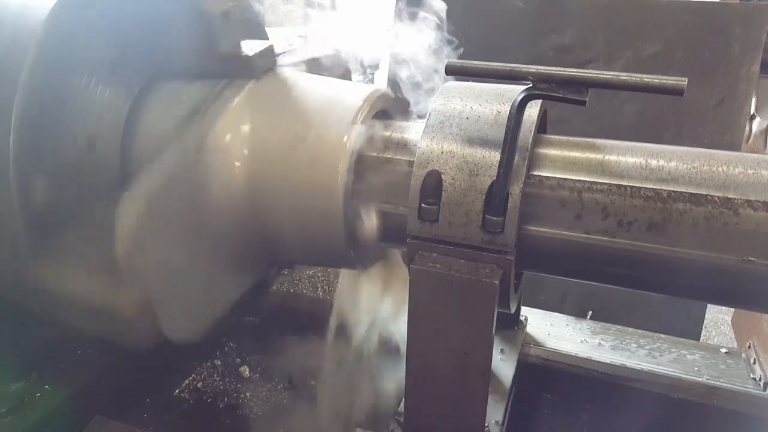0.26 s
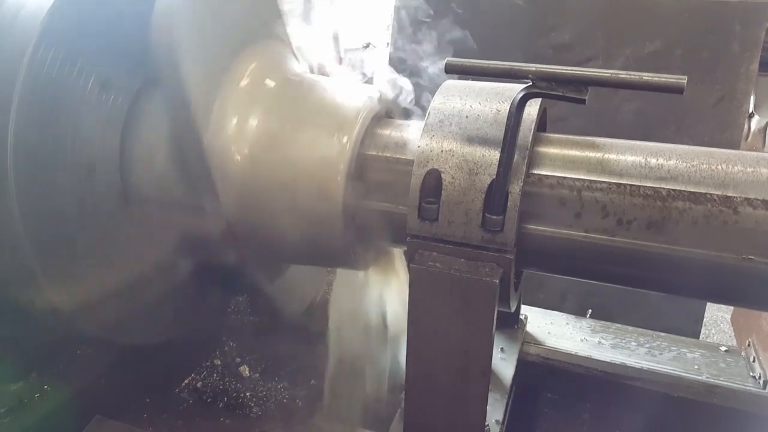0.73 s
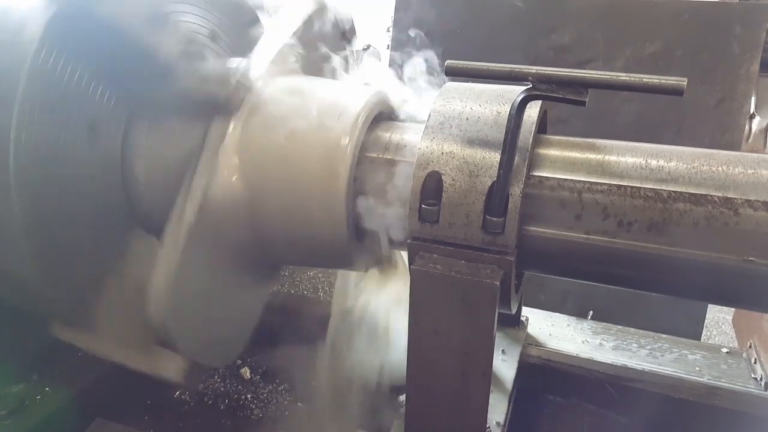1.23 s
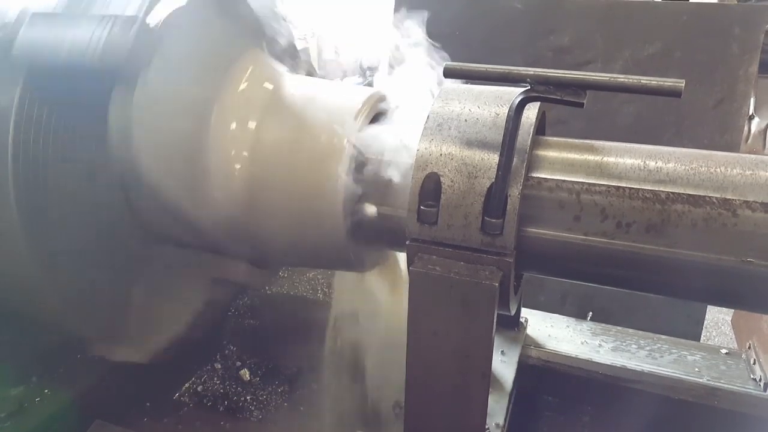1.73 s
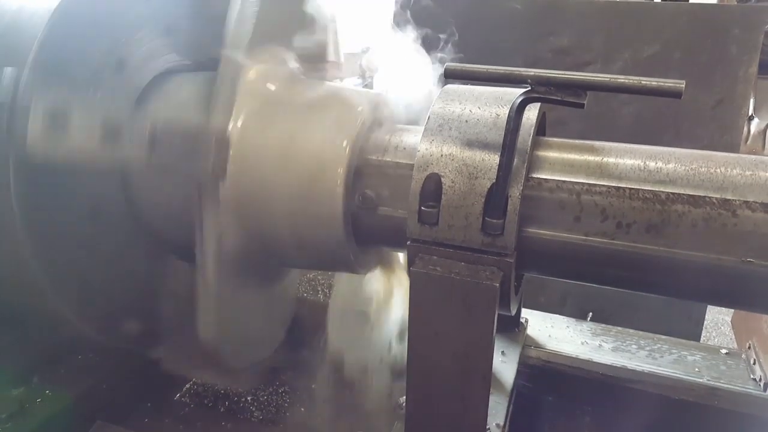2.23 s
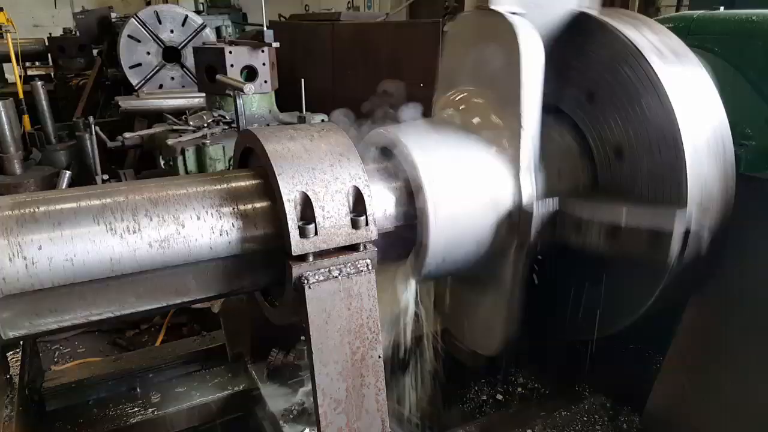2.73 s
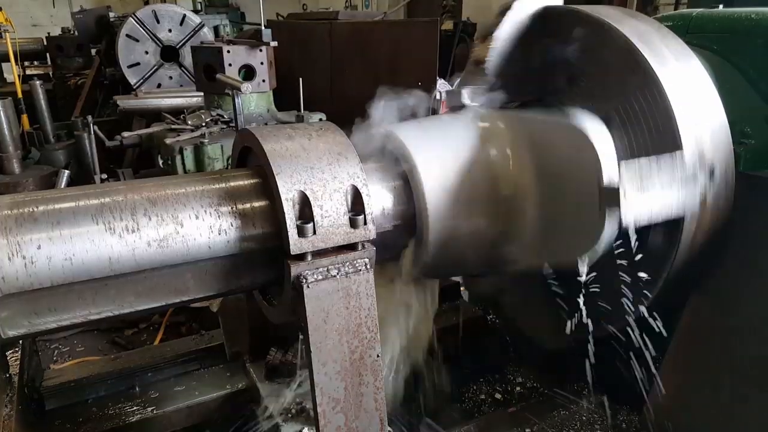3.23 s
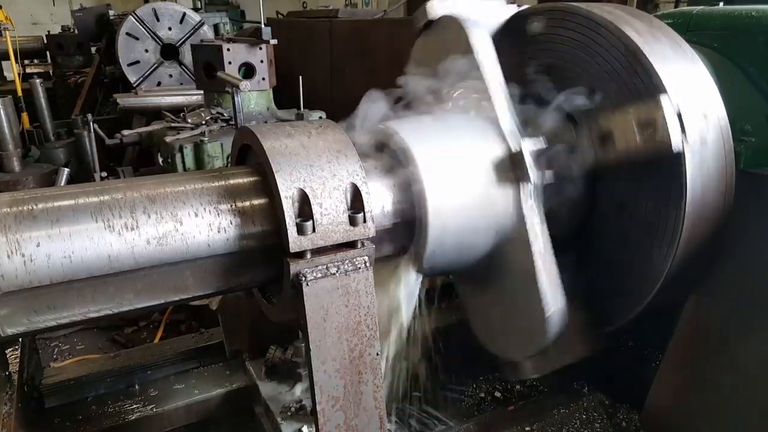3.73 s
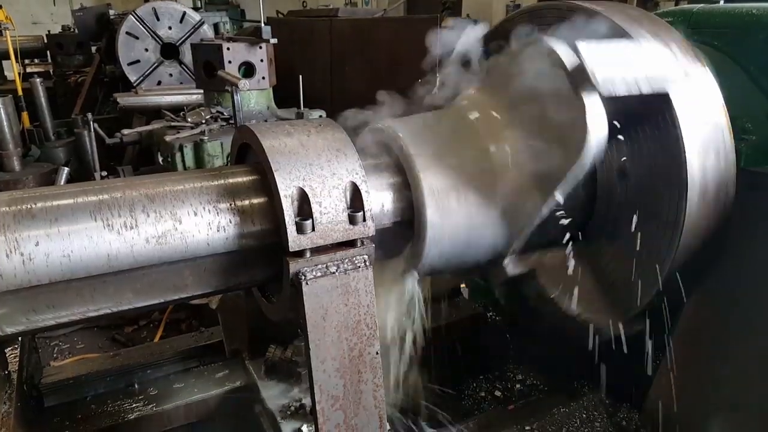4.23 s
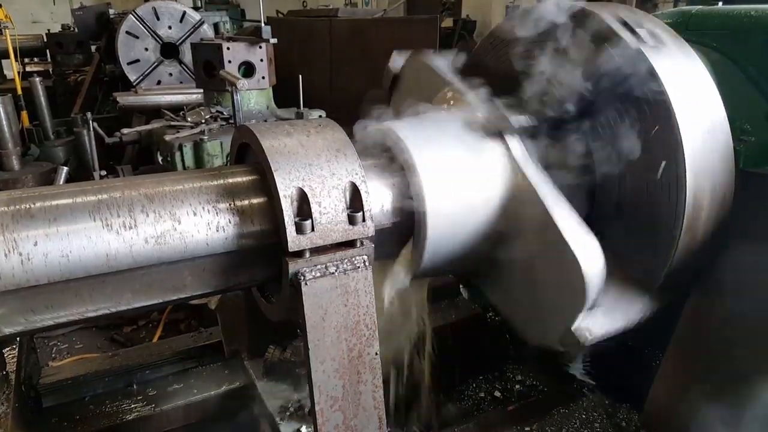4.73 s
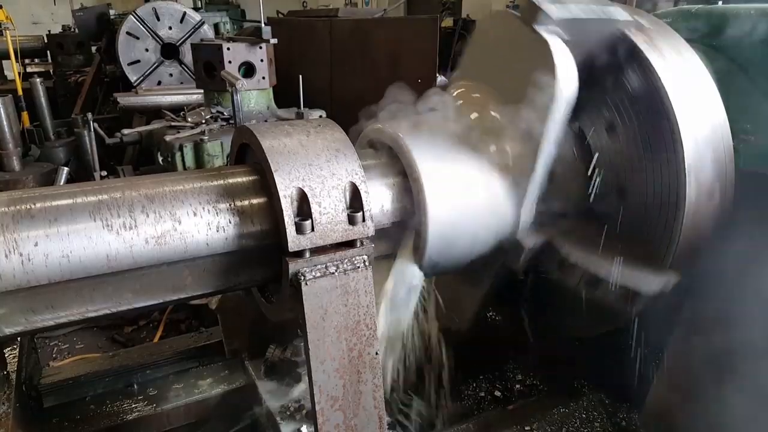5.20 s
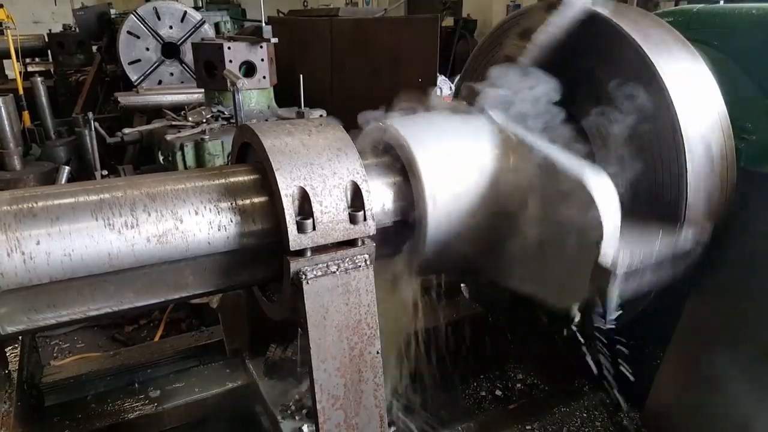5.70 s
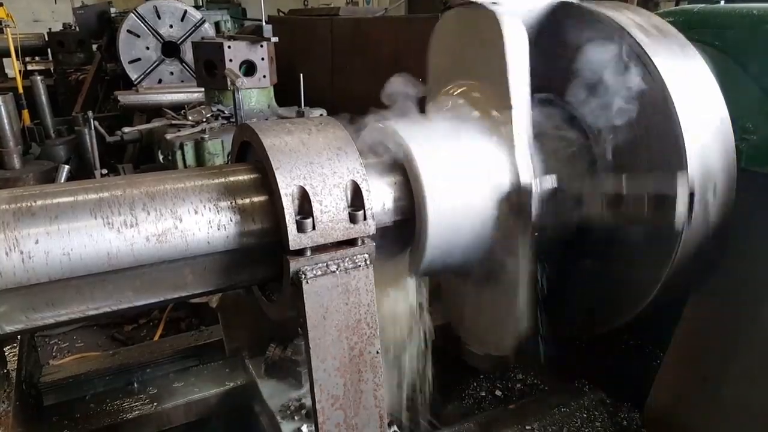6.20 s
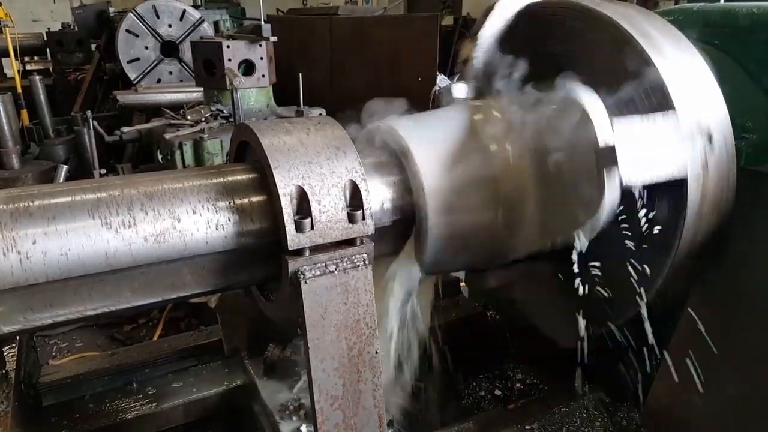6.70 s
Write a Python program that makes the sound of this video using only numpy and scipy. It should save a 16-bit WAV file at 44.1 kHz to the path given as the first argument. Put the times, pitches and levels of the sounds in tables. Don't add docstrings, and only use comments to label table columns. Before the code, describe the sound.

Close to a running lathe in a hard-walled workshop, a cutting tool shrieks and chatters continuously, swelling and easing unevenly. Beneath it lie a fluttering gear hum and soft coolant hiss; thin metallic rings and small chip clicks dot the first part. After a tiny silence the squeal resumes at a lower pitch, with two rough tones beating together and fewer clicks until the abrupt end.

```python
import sys
import numpy as np
from scipy import signal
from scipy.fft import rfft, irfft, next_fast_len
from scipy.io import wavfile
from scipy.ndimage import uniform_filter1d

SR = 44100
rng = np.random.default_rng(int(sys.argv[2]) if len(sys.argv) > 2 else 0)


def inscribe(sig):
    pcm = np.round(np.clip(np.atleast_2d(sig).T, -1, 1) * 32767)
    wavfile.write(sys.argv[1], SR, pcm.astype(np.int16))


def convert_level_to_amplitude(level_db):
    exponent = np.asarray(level_db, float) / 20
    return 10 ** exponent


N = 306495
SPINDLE_PER_S = 0.581


def rms_one(x):
    return x / np.sqrt(np.mean(x ** 2) + 1e-20)


def evened(x):
    return x / np.sqrt(uniform_filter1d(np.mean(x ** 2, axis=0), size=4000))


def at_hz(points, hz):
    point_hz, value = np.transpose(points)
    return np.interp(np.log(hz + 1), np.log(point_hz), value)


def drift(n, rate):
    r = np.exp(-40 * np.pi * rate / SR)
    slow = signal.lfilter([1], [1, -2 * r, r * r], rng.standard_normal(n // 20 + 4002))[4000:]
    return np.interp(np.arange(n) / 20, np.arange(len(slow)), rms_one(slow))


def per_turn(t, rows, rate):
    return sum(swing * np.cos(2 * np.pi * (k * rate * t - lag)) for k, swing, lag in rows)


def resonate(x, hz, width_hz):
    r = np.exp(-np.pi * width_hz / SR)
    top = np.array([1, 0, -1]) * (1 - r * r) / 2
    return signal.lfilter(top, [1, -2 * r * np.cos(2 * np.pi * hz / SR), r * r], x)


# frequency in Hz, left-right likeness from 0 to 1.
EAR_LIKENESS = [(30, .8), (150, 0.99), (400, 0.83), (900, 0.3), (2000, 0.18), (6000, 0.037), (14000, 0.045)]


def banded_noise(n, spectrum, shared_db, own_db, rate):
    size = next_fast_len(n)
    hz = np.arange(size // 2 + 1) * SR / size
    mid, side = rfft(rng.standard_normal((2, size))) * convert_level_to_amplitude(at_hz(spectrum, hz))
    alike = np.clip(at_hz(EAR_LIKENESS, hz), 0, 1)
    pair = np.sqrt(1 + alike) * mid + np.sqrt(1 - alike) * side * np.array([[1], [-1]])
    out, together = 0, drift(n, rate)
    place = np.log2(hz + 1) * 1.5
    lowest, highest = spectrum[0][0], spectrum[-1][0]
    for k in range(int(np.log2(lowest) * 1.5), int(np.log2(highest) * 1.5) + 2):
        band = irfft(pair * np.clip(1 - abs(place - k), 0, 1), size)[:, :n]
        out = out + band * convert_level_to_amplitude(shared_db * together + own_db * drift(n, rate * 2.55))
    return rms_one(out)


def shop(x, wet_db, right_delay):
    t60_s, build_up_s = 0.61, 0.0069
    t = np.arange(SR) / SR
    tail = rng.standard_normal((3, SR)) * convert_level_to_amplitude(-60 * t / t60_s) * np.clip(t / build_up_s, 0, 1)
    tail = tail[:2] + 0.38 * tail[2]
    tail *= convert_level_to_amplitude(wet_db) / np.sqrt(np.sum(tail ** 2, axis=1, keepdims=True))
    tail[[0, 1], [0, right_delay]] += 1
    return signal.fftconvolve(x[None], tail, axes=1)[:, :len(x)]


# chatter in Hz, then squeal, overtones, machine rumble, coolant hiss in dB.
MEAN_CUT = [
    (1301.6, -13, -22, -23.5, -33),
    (1133.6, -10.5, -23.5, -26.5, -35),
]
# moment in seconds, level in dB.
CHIP_GRIPS = [(0.02, 2), (.36, -0.4), (.64, 0.6), (.76, -1.5), (.86, 0.8), (.96, -0.9), (1.06, 3.2),
              (1.14, -4.5), (1.23, 4.5), (1.33, -0.5), (1.46, 3), (1.99, -2), (2.14, 2.4), (2.25, -2),
              (2.61, 2.5), (3.091, 3.5), (3.44, 0.1), (3.63, 5), (3.95, -0.3), (4.21, 3.2), (4.38, -3),
              (4.52, 2.6), (4.62, -2.5), (4.8, 0.7), (5.25, 0.5), (5.52, -1.5), (6.06, 0.9), (6.31, -2),
              (6.51, 1), (6.61, -1)]
# times per turn, swing in dB, lag in cycles.
OVERTONE_SWING = [
    [(1, 0.12, 0.83), (2, 0.37, .84), (4, 0.75, 0.55)],
    [(1, 1.3, 0.59), (2, 0.7, 0.92), (4, .2, 0.26)],
]
# times per turn, swing in dB, lag in cycles.
HISS_SWING = [
    [(1, 1.5, .09), (2, 0.94, 0.5), (4, 0.64, .5), (6, 0.37, 0.38)],
    [(1, 1.3, 0.4), (2, .4, .92), (4, 0.25, 0.11), (6, 0.27, 0.61)],
]
# surges per second, swing in dB, lag in cycles.
BELT_SURGE = [
    (3.315, 0.9, 0.44),
    (3.265, 0.9, 0.38),
]
GIVE_WAY = (.15, 0.49, 0.15)


def levels(t, side):
    half_width_s = 0.046
    grip = sum(db * np.exp(-0.5 * ((t - s) / half_width_s) ** 2) for s, db in CHIP_GRIPS)
    _, squeal_db, overtone_db, rumble_db, hiss_db = MEAN_CUT[side]
    overtone_yield, rumble_yield, hiss_yield = GIVE_WAY
    return (squeal_db + grip,
            overtone_db + per_turn(t, OVERTONE_SWING[side], SPINDLE_PER_S) - overtone_yield * grip,
            rumble_db + per_turn(t, [BELT_SURGE[side]], 1) - rumble_yield * grip,
            hiss_db + per_turn(t, HISS_SWING[side], SPINDLE_PER_S) - hiss_yield * grip)


# times per turn, swing in Hz, lag in cycles.
PITCH_SWING = [
    [(1, 30, .44), (2, 10.74, .81), (4, 11.07, 0.1355), (6, 12.7, 0.86)],
    [(1, 22, .08), (3, 10.96, 0.97), (4, 4.1, 0.702), (6, 11.28, 0.2027)],
]
PITCH_WOBBLE = [
    (0.0574, 0.0805, 0.0305),
    (0.0442, 0.083, 0.03536),
]


def edge(t, side, ratio):
    n, (rate, throb_s) = len(t), GEAR_SHAFT[side]
    swing, lag, wander = PITCH_WOBBLE[side]
    quick = drift(n, 30)
    quick = rms_one(quick - uniform_filter1d(quick, size=5000))
    quick = 1.6 * np.tanh(quick / 1.6)
    gear_swing = swing * np.cos(2 * np.pi * (rate * (t - throb_s) - lag))
    restless = gear_swing + wander * quick + 0.013 * drift(n, 193)
    hz = ratio * (MEAN_CUT[side][0] + per_turn(t, PITCH_SWING[side], SPINDLE_PER_S)) * (1 + restless)
    return 2 * np.pi * np.cumsum(hz) / SR, convert_level_to_amplitude(3.86 * drift(n, 60))


# multiple of the chatter pitch, level in dB.
CHATTER_OVERTONES = [
    [(2, 8), (3, 5.5), (4, -4), (5, -14), (6, -41), (7, -37.5)],
    [(2, 2), (3, 0), (4, -7.5), (5, -13.5), (6, -12.5), (7, -15.5)],
]
# pitch ratio, level in dB re first edge, its overtones in dB re the first's.
OTHER_EDGE = [
    (1.09, -13, -14),
    (1.12, -3.0, -6.0),
]
# centre in Hz, width in Hz, boost in dB.
HOLLOW_BORE = [
    (1544, 1400, 3.5),
    (1195, 740, 4),
]


def chatter(t, side, squeal_db, overtone_db):
    ratio, second_db, second_upper_db = OTHER_EDGE[side]
    phase, bite = edge(t, side, 0.98)
    phase_2, bite_2 = edge(t, side, ratio)
    tone = bite * np.sin(phase) + convert_level_to_amplitude(second_db) * bite_2 * np.sin(phase_2)
    hz, width_hz, bore_db = HOLLOW_BORE[side]
    hollow = resonate(resonate(tone, hz, width_hz), hz, width_hz)
    squeal = shop(tone + convert_level_to_amplitude(bore_db) * hollow, wet_db=-0.5, right_delay=0)
    upper = 0
    for k, db in CHATTER_OVERTONES[side]:
        pair = np.sin(k * phase) + convert_level_to_amplitude(second_upper_db) * np.sin(k * phase_2)
        upper = upper + convert_level_to_amplitude(db + 4.5 * drift(len(t), 40)) * pair
    upper = shop(bite * upper, wet_db=-2, right_delay=2)
    return convert_level_to_amplitude(squeal_db) * evened(squeal) + convert_level_to_amplitude(overtone_db - 3.5) * evened(upper)


# turns per second, moment of a throb in seconds.
GEAR_SHAFT = [
    (11.65, 1.430),
    (11.615, 4.944),
]
# multiple of the shaft rate, level in dB re rumble.
TOOTH_TONES = [
    [(10, -22), (18, -24.5), (19, -7.5), (20, -9), (38, -16.5), (59, -19.5), (75, -21)],
    [(10, -28), (18, -12.5), (19, -8), (20, -9.5), (35, -22.5), (38, -17), (75, -19.5)],
]
# frequency in Hz, density in dB per Hz.
MACHINE_RUMBLE = [
    [(15, -75), (25, -46.5), (119, -7), (189, -8), (223, -0.5), (259, -5), (330, -13.5), (438, -9),
     (697, -8.5), (823, -16), (900, -15.5), (1170, -62), (1980, -120)],
    [(15, -80), (25, -61.5), (48, -26), (81, -24), (109, -8.5), (186, -11), (220, -3), (320, -12.5),
     (413, -10.5), (775, -13), (900, -17.5), (1170, -48.5), (1980, -120)],
]


def gears(t, side):
    n, (rate, throb_s) = len(t), GEAR_SHAFT[side]
    turn = 2 * np.pi * rate * (t - throb_s)
    tones = sum(convert_level_to_amplitude(db + 0.31 * drift(n, 0.63)) * np.sqrt(2) * np.cos(k * turn)
                for k, db in TOOTH_TONES[side])
    knock = convert_level_to_amplitude(0.52 * np.cos(turn))
    return tones + knock * banded_noise(n, MACHINE_RUMBLE[side], shared_db=0.97, own_db=0.56, rate=4.0)


# frequency in Hz, density in dB per Hz.
COOLANT_HISS = [
    [(700, -17), (1000, 16.5), (1800, 9.5), (3200, -1), (5000, 0), (7000, -5.5), (9000, -4), (10200, -15.5),
     (11500, -18.5), (13500, -22.5), (14600, -32), (15500, -68)],
    [(700, -40), (1000, 22), (1800, 12.5), (2900, 5), (5000, 1.5), (7000, 2), (9500, -4.5), (10300, -28.5),
     (11200, -16.5), (13400, -9.5), (14400, -33.5), (15500, -53.5)],
]
# frequency in Hz, width in Hz, level in dB.
BAR_RINGS = [
    [(5180, 200, -32.5), (7530, 150, -11.5), (8800, 72, -18)],
    [(6475, 80, -9), (8050, 120, -10), (9730, 38, -17.5), (13400, 90, -54)],
]


def coolant(t, side):
    hiss = banded_noise(len(t), COOLANT_HISS[side], shared_db=1.0, own_db=2.94, rate=8.3)
    stream = rng.standard_normal((2, len(t)))
    bar = sum(convert_level_to_amplitude(db) * rms_one(resonate(stream, hz, width)) for hz, width, db in BAR_RINGS[side])
    return convert_level_to_amplitude(11.0) * hiss + bar


# start in seconds, length in seconds, level in dB.
LOOSE_RINGS = [(0.05, 0.03, -32), (0.38, 0.11, -33), (0.824, 0.046, -30), (1.3, 0.056, -36),
               (1.76, 0.039, -32.5), (2.147, 0.081, -35), (2.305, 0.024, -29), (2.552, 0.045, -30.5),
               (2.628, .04, -40)]


def loose_part():
    ring_hz, width_hz = 4285, 27
    t = np.arange(N) / SR
    shaking = sum(convert_level_to_amplitude(db) * (abs(t - s - length / 2) < length / 2) for s, length, db in LOOSE_RINGS)
    tone = np.sqrt(2) * np.sin(2 * np.pi * ring_hz * t + 0.63 * drift(N, 20))
    return resonate(shaking * tone, ring_hz, width_hz) * convert_level_to_amplitude([[1.5], [-1.5]])


# start in seconds, peak level in dB, pan in dB to the left.
CHIP_SNAPS = [(0.107, -25.5, 10.5), (0.3257, -20.5, 7.5), (0.5756, -18, 0), (0.9572, -19.5, 8.5),
              (1.274, -24, -10.5), (1.551, -18, 1), (1.9027, -17.5, -6), (2.03, -13, -8),
              (2.418, -32.5, -11.5), (3.1323, -24, 2), (3.3326, -22.5, 2.5), (3.5317, -21.5, 0),
              (4.7227, -33.5, 3.5), (5.216, -25, -4), (5.581, -29.5, -20), (6.1957, -22.5, 8),
              (6.6564, -20.5, -1)]
# frequency in Hz, level in dB, 60 dB decay in seconds.
CHIP_TONES = [(4130, 0.5, 0.061), (5540, 2.5, 0.042), (6200, -3.5, 0.028), (7840, -2.5, 0.063),
              (8440, -14.5, 0.034), (9800, -7.5, .03)]


def chips():
    out = np.zeros((2, N))
    t = np.arange(SR // 8) / SR
    for s, db, pan in CHIP_SNAPS:
        snap = np.diff(rng.standard_normal(len(t) + 1)) * convert_level_to_amplitude(-26.5 - 60 * t / 0.044)
        for hz, mode_db, t60_s in CHIP_TONES:
            strength_db = mode_db - 8.0 + 1.5 * rng.standard_normal()
            snap = snap + convert_level_to_amplitude(strength_db - 60 * t / t60_s) * np.sin(2 * np.pi * hz * t)
        start = round(s * SR)
        out[:, start:start + len(t)] += convert_level_to_amplitude(db + np.array([[pan], [-pan]]) / 2) * snap[:N - start]
    return out


# start in seconds, end in seconds.
LISTENING_SIDES = [
    (0, 2.7475),
    (2.8445, 6.95),
]


def scene():
    out, small = np.zeros((2, N)), loose_part() + chips()
    lead = SR // 2
    for side, (start, end) in enumerate(LISTENING_SIDES):
        first, last = round(start * SR), min(round(end * SR), N)
        t = (np.arange(-lead, last - first) + first) / SR
        squeal_db, overtone_db, rumble_db, hiss_db = levels(t, side)
        lathe = chatter(t, side, squeal_db, overtone_db)
        lathe = lathe + convert_level_to_amplitude(rumble_db) * gears(t, side)
        lathe = lathe + convert_level_to_amplitude(hiss_db) * coolant(t, side)
        out[:, first:last] = lathe[:, lead:] + small[:, first:last]
    return out


def band_limit(x):
    return signal.sosfilt(signal.butter(12, 14950, fs=SR, output="sos"), x)


# frequency in Hz, left minus right in dB.
PORT_BALANCE = [(60, 0), (180, 0.5), (540, 0), (1600, 1), (4800, -0.5), (9000, 1.5), (14400, 12.5)]


def record(dry):
    size = next_fast_len(N)
    hz = np.arange(size // 2 + 1) * SR / size
    tilt = at_hz(PORT_BALANCE, hz) / 2
    one_sample_early = np.exp(2j * np.pi * hz / SR)
    ports = convert_level_to_amplitude([tilt, -tilt]) * [one_sample_early, np.ones(len(hz))]
    is_open = uniform_filter1d(1.0 * (dry != 0), size=40, mode="constant") ** 4
    heard = irfft(rfft(dry, size) * ports, size)[:, :N] * is_open
    rounded = heard / (1 + (heard / 0.93) ** 6) ** (1 / 6)
    return band_limit(rounded)


dry = scene()
out = record(dry)
inscribe(out)
```